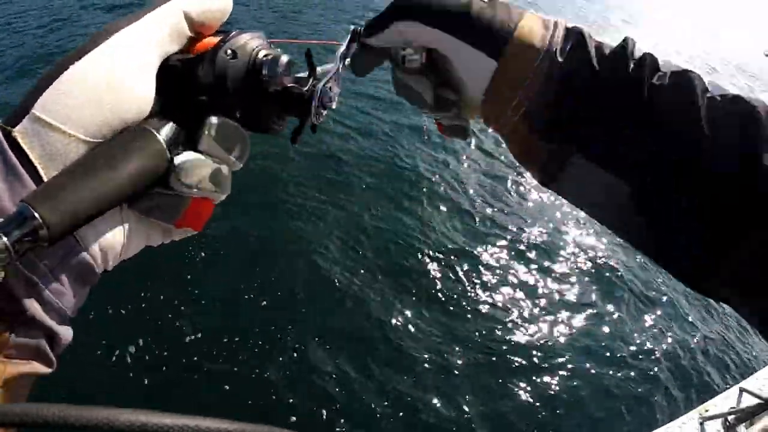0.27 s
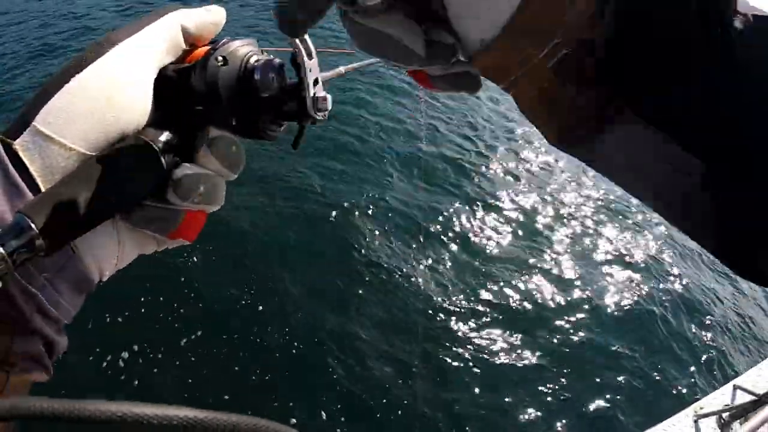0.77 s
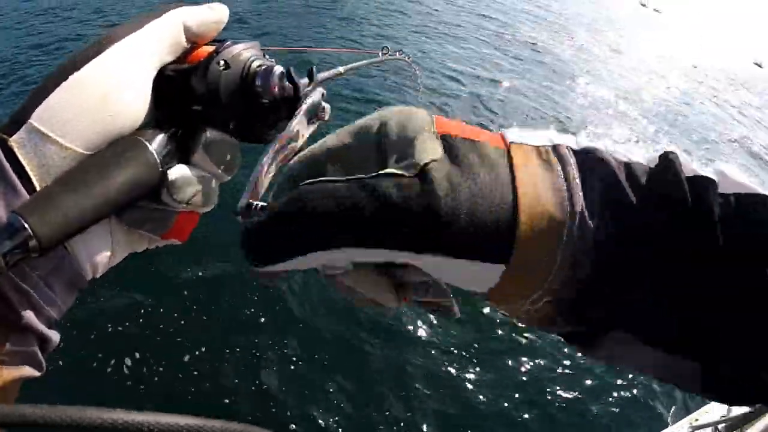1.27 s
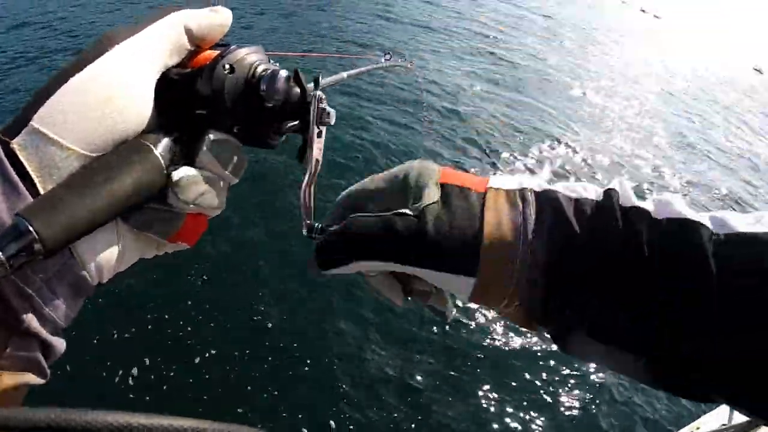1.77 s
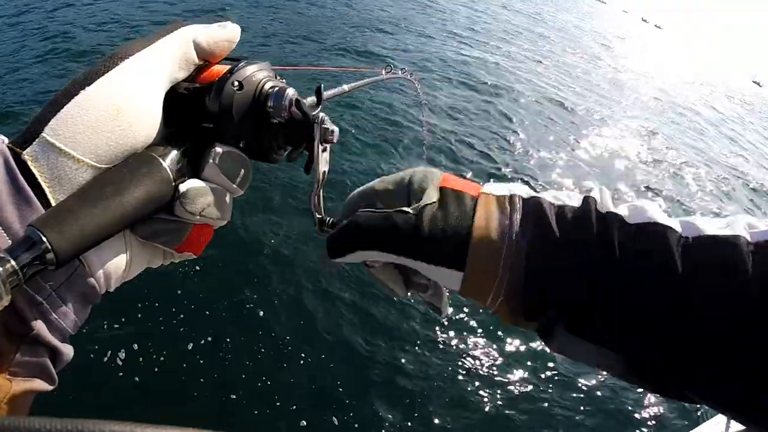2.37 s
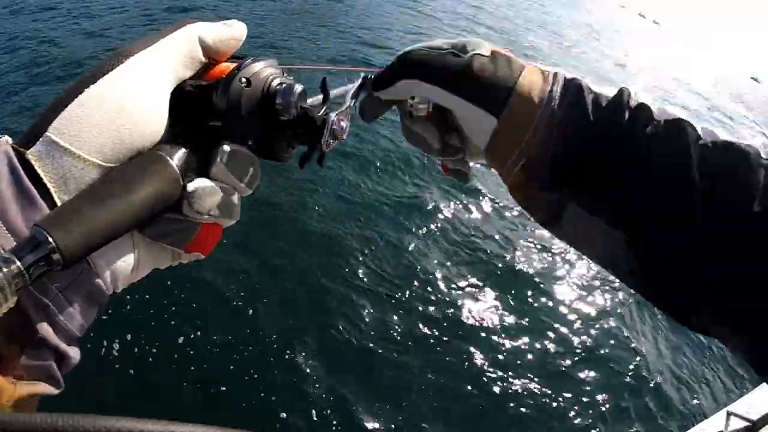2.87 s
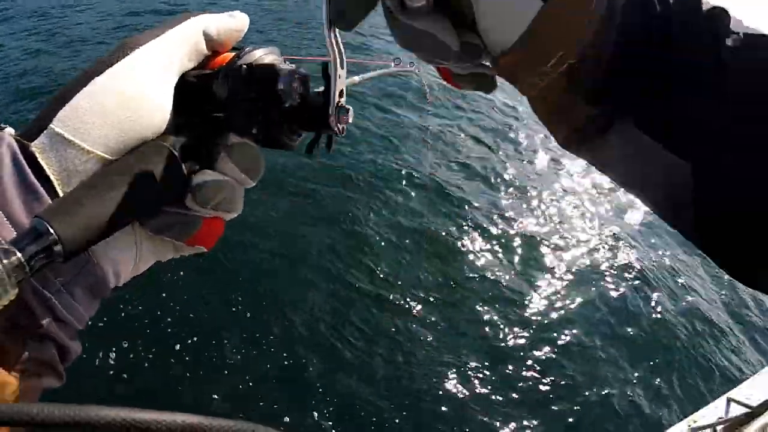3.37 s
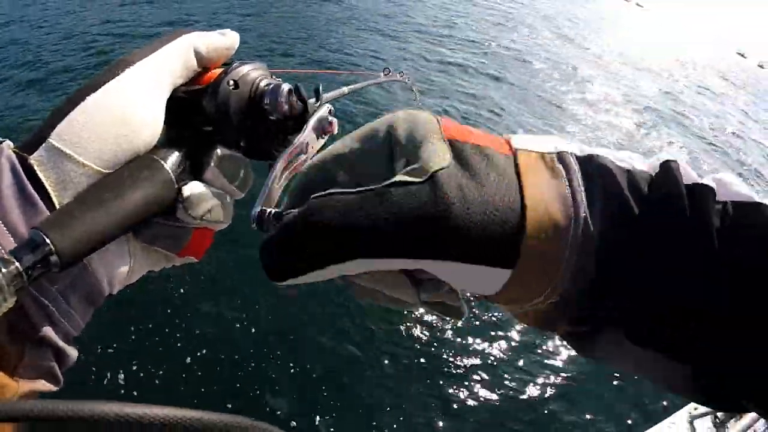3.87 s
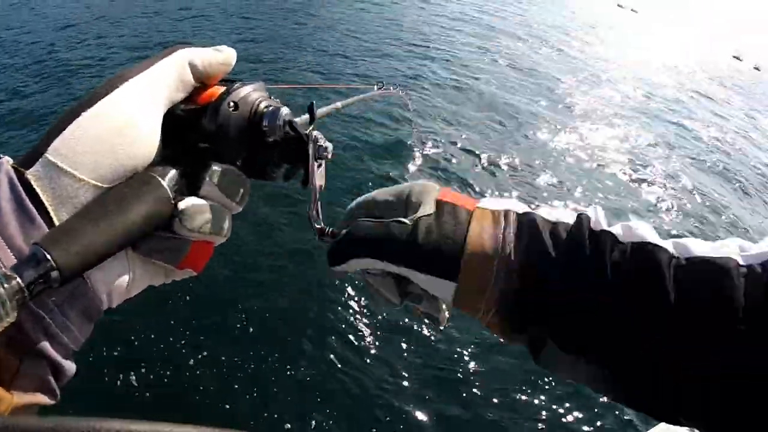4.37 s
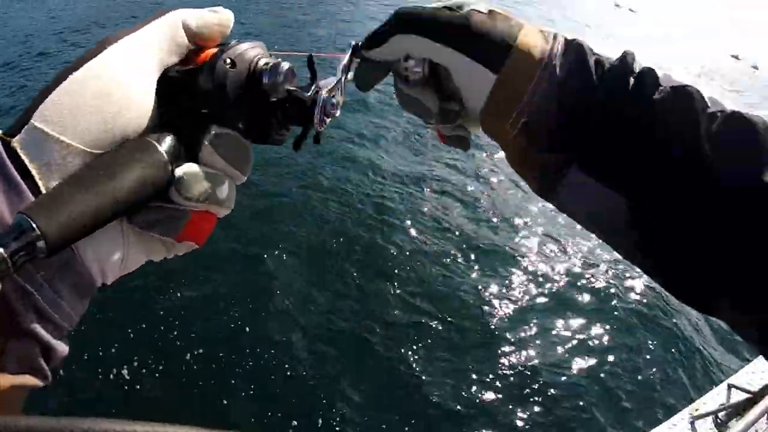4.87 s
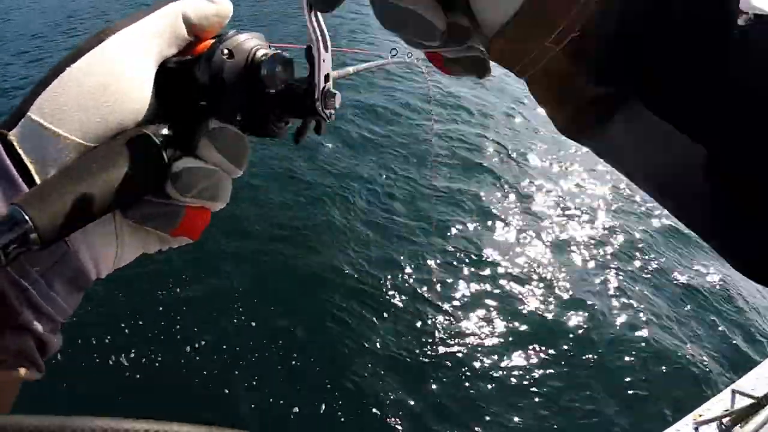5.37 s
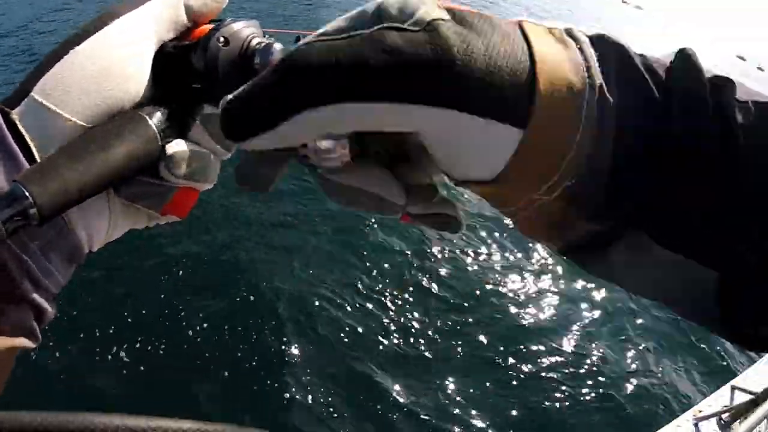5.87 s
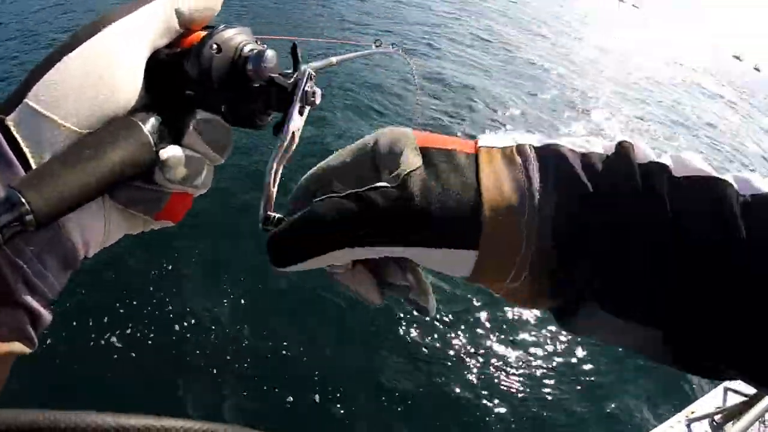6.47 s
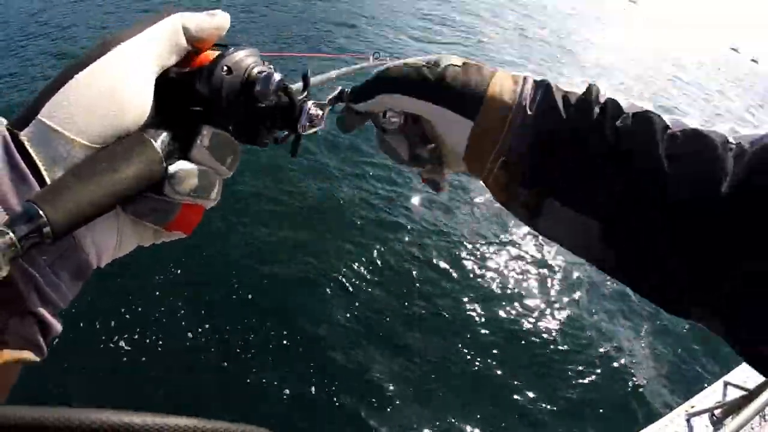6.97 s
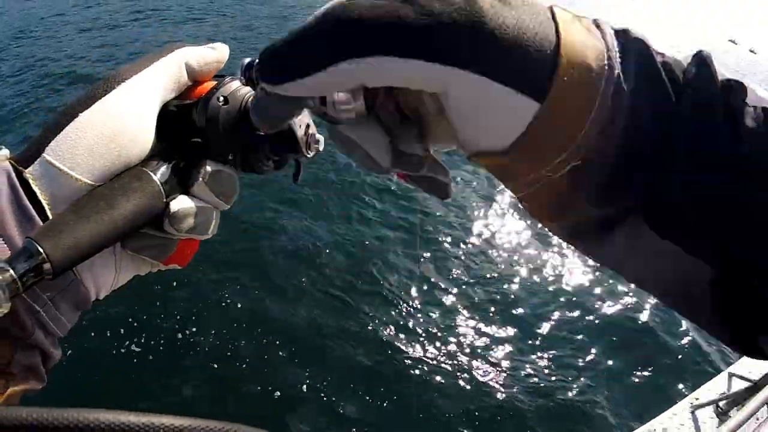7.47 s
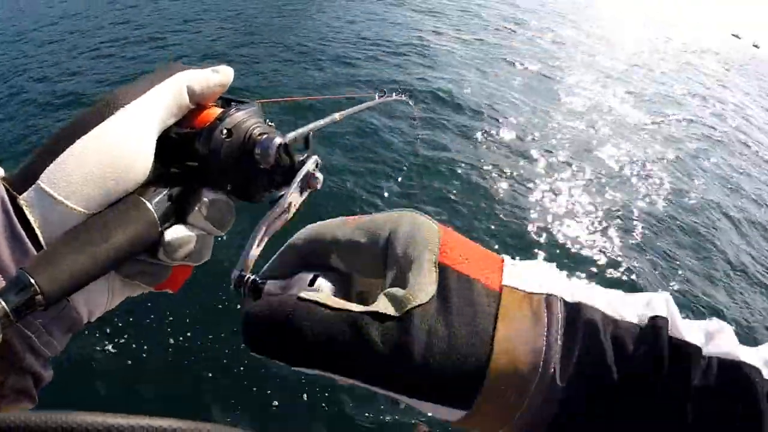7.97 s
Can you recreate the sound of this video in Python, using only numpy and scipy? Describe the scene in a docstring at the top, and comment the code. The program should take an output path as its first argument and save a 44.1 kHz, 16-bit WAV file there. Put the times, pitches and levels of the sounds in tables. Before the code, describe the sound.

On a small fishing boat, a diesel engine idles with a steady low rumble and light rattle while wind thumps irregularly on the microphone. Close by, a fishing reel starts winding almost at once and keeps going, its gears whirring and grinding with brief squeaks and sharp ticks. A sleeve brushes past now and then, and the sea washes faintly behind.

```python
"""Wind thumps on the microphone over the rumble of an idling six-cylinder diesel.
We stand at the rail of a small fishing boat: the sea washes behind, machinery hums on board, and
each firing sets the engine block clattering and a loose fitting rattling. Close by, an angler winds
in a reel whose gears whirr, grind, squeak and tick; a sleeve brushes past and faint hoots come and go.
One microphone hears it all, with a limiter holding the gusts down."""
import sys
import numpy as np
from scipy import signal
from scipy.fft import rfft, irfft, next_fast_len
from scipy.io import wavfile
from scipy.ndimage import uniform_filter1d, minimum_filter1d, map_coordinates

SR = 44100
rng = np.random.default_rng(int(sys.argv[2]) if len(sys.argv) > 2 else 0)


def int16_out(signal):
    """Quantize to a 16-bit WAV file."""
    q = np.round(np.clip(np.atleast_2d(signal).T, -1, 1) * 32767)
    wavfile.write(sys.argv[1], SR, q.astype(np.int16))


N = 361971


def from_db(db):
    """Decibels to gain."""
    return 10 ** (np.asarray(db) / 20)


def rms_one(x):
    """Scale to unit power."""
    return x / np.sqrt(np.mean(x ** 2) + 1e-20)


def seconds():
    """The time of every sample."""
    return np.arange(N) / SR


def in_time(curve):
    """Join (time, value) points by straight lines."""
    return np.interp(seconds(), *np.transpose(curve))


def swell(centre_s, half_s):
    """A bell-shaped envelope, down to 1/e at half_s either side of its centre."""
    return np.exp(-np.minimum(((seconds() - centre_s) / half_s) ** 2, 50))


def drift(rate):
    """A smooth random wander with spread 1, changing about rate times a second."""
    step, settle = 40, 2000
    pole = np.exp(-2 * np.pi * step * rate / SR)
    white = rng.standard_normal(N // step + settle + 2)
    slow = signal.lfilter([1], [1, -2 * pole, pole * pole], white)[settle:]
    return np.interp(np.arange(N) / step, np.arange(len(slow)), rms_one(slow))


def filtered(x, order, hz, kind):
    """A maximally flat low-, high- or band-pass."""
    return signal.sosfilt(signal.butter(order, hz, kind, fs=SR, output="sos"), x)


def coloured(x, spectrum):
    """Give a signal a spectrum that falls away steeply beyond its ends; rms 1."""
    hz, db = np.transpose(spectrum)
    size = next_fast_len(N)
    f = np.maximum(np.arange(size // 2 + 1) * SR / size, 1)
    skirts = np.minimum(f / hz[0], 1) ** 2 * np.minimum(hz[-1] / f, 1) ** 2
    shape = from_db(np.interp(np.log(f), np.log(hz), db))
    return rms_one(irfft(rfft(x, size) * skirts * shape, size)[:N])


def noise(spectrum):
    """Noise with the given spectrum; rms 1."""
    return coloured(rng.standard_normal(N), spectrum)


def evened(x, span_s):
    """Take the slow swells out of a noise."""
    return x / np.sqrt(uniform_filter1d(x ** 2, max(int(span_s * SR), 2)) + 1e-9)


def resonate(x, modes):
    """Parallel resonances of alternating sign."""
    out = np.zeros(len(x))
    for k, (hz, width, db) in enumerate(modes):
        r = np.exp(-np.pi * width / SR)
        poles = [1, -2 * r * np.cos(2 * np.pi * hz / SR), r * r]
        out += (-1) ** k * from_db(db) * (1 - r * r) / 2 * signal.lfilter([1, 0, -1], poles, x + 1e-18)
    return out


def steep_ring(x, hz, width, skirt_hz, db=0):
    """One resonance, its skirts trimmed by a second of width skirt_hz."""
    return resonate(resonate(x, [(hz, width, db)]), [(hz, skirt_hz, 0)])


# Water around the boat: f/Hz, relative density/dB
SEA_SPECTRUM = [(300, 3), (800, -2.5), (1100, -9.5), (1600, -15), (2300, -12.5), (3000, -18.5), (4000, -18),
                (5000, -35.5), (5850, -33), (6400, -27.5), (7500, -28), (10000, -32), (12000, -36.5),
                (15000, -37.5)]

def sea(level_db=-46.0, lapping_db=0.8):
    """The even wash of the water, out beyond the rail."""
    return from_db(level_db + lapping_db * drift(4.3)) * noise(SEA_SPECTRUM)


# Steady machinery on board: f/Hz, relative level/dB
HUM_TONES = [(36.1, -30), (60.7, -27), (78.2, -31), (84.3, -31.5), (117.1, -31.5), (144.4, -33.5),
             (272.9, -48), (367.9, -46.5), (412.5, -45.5)]

def machinery(hum_db=2.0, waver_db=3.5):
    """Steady tones from elsewhere on the boat beat against the engine."""
    clock = seconds() + np.cumsum(0.00089 * drift(0.72)) / SR
    tones = sum(from_db(db + waver_db * drift(1.98)) * np.sin(2 * np.pi * (hz * clock + rng.random()))
                for hz, db in HUM_TONES)
    return from_db(hum_db) * tones


# Hollow tones in the background: t/s, length/s, start f/Hz, end f/Hz, relative level/dB
HOOT_GLIDES = [(0.33, 0.081, 490, 433, -30.5), (1.054, 0.1, 501, 517, -32.5),
               (3.637, 0.34, 485, 427, -32.5)]

def hoots(waver=0.00515):
    """Faint hollow tones start quickly and glide as they fade."""
    out = np.zeros(N)
    for s, length, start_hz, end_hz, db in HOOT_GLIDES:
        along = np.clip((seconds() - s) / length, 0, 1)
        hz = (start_hz + (end_hz - start_hz) * along) * (1 + waver * drift(20.4))
        envelope = np.minimum(along * 12, 1) * np.sqrt(1 - along)
        out += from_db(db) * envelope * np.sin(2 * np.pi * np.cumsum(hz) / SR)
    return out


# Resonances of a loose fitting on board: f/Hz, width/Hz, relative level/dB
FITTING_MODES = [(3240, 90, -2), (3390, 39, 1.5), (3484, 74, 0)]
# How hard it rattles: t/s, relative level/dB
RATTLE_LEVEL = [(0.15, -65.5), (0.75, -55), (0.9, -65), (1.12, -52), (1.7, -60), (2.42, -55), (2.65, -69),
                (2.9, -53), (3.1, -62), (3.5, -53), (3.87, -50.5), (4.1, -57), (4.35, -51.5), (4.6, -55.5),
                (4.92, -49), (5.35, -62), (5.87, -49.5), (6.2, -63), (6.47, -52.5), (6.85, -61), (7.1, -56),
                (7.3, -59), (8.2, -51.5)]

def rattle(firings, level_db=-1.5, jitter_s=0.0006, uneven_db=2.0, mode_spread_db=4.0, bounce_db=-12.5):
    """Each firing knocks the fitting, a little early or late; it bounces once, and no two ring alike."""
    beats = np.flatnonzero(np.diff(np.floor(firings + 0.5)))
    hits = beats + jitter_s * SR * rng.standard_normal(len(beats))
    bounces = hits + SR * rng.uniform(0.0035, 0.0203, len(beats))
    when = np.clip(np.r_[hits, bounces].astype(int), 0, N - 1)
    knock_db = np.repeat([0, bounce_db], len(beats)) + uneven_db * rng.standard_normal(len(when))
    ringing = np.zeros(N)
    for hz, width, db in FITTING_MODES:
        strength = from_db(knock_db + mode_spread_db * rng.standard_normal(len(when)))
        knocks = np.zeros(N)
        knocks[when] = strength * rng.choice([-1, 1], len(when))
        ringing += steep_ring(knocks, hz, width, skirt_hz=600, db=db)
    return from_db(in_time(RATTLE_LEVEL) + level_db) * evened(rms_one(ringing), span_s=0.72)


FIRING_HZ, CYLINDERS = 47.45, 6
# Engine rumble at the rail: multiple of the working cycle, relative level/dB
ENGINE_ORDERS = [(6, -35.5), (9, -34.5), (12, -26.5), (14, -41.5), (16, -30), (18, -50.5), (21, -30),
                 (22, -51), (30, -51), (32, -49.5), (45, -51.5), (51, -50.5)]
# Resonances of the engine block: f/Hz, width/Hz, relative level/dB
BLOCK_MODES = [(897, 24, 5.5), (1430, 82, -2.5), (1594, 160, -6), (1850, 130, -6.5), (2120, 61, -7),
               (2835, 44, -7), (4700, 480, -26)]

def diesel(rumble_db=-5.5, clatter_db=-50.5, knock_sharpness=2.4, uneven_db=1.0, waver_db=3.0):
    """The engine rumbles at orders of its working cycle; each firing shakes the block and the fitting."""
    firings = np.cumsum(FIRING_HZ * (1 + 0.0012 * drift(1.683))) / SR
    cycle = firings / CYLINDERS
    rumble = sum(from_db(db + waver_db * drift(2.3)) * np.sin(2 * np.pi * (order * cycle + rng.random()))
                 for order, db in ENGINE_ORDERS)
    knock = np.sin(np.pi * firings) ** 2
    cylinder_db = uneven_db * rng.standard_normal(CYLINDERS)
    bursts = knock ** knock_sharpness * from_db(cylinder_db[firings.astype(int) % CYLINDERS])
    clatter = rms_one(resonate((0.34 + bursts) * rng.standard_normal(N), BLOCK_MODES))
    return from_db(rumble_db) * rumble + from_db(clatter_db) * clatter + rattle(firings)


# Large eddies on the microphone: f/Hz, relative density/dB
BUFFET_SPECTRUM = [(10, -16.5), (18, -2), (32, 3), (55, 0.5), (80, -5), (115, -6), (160, -20), (250, -27),
                   (400, -62.5)]
# Small eddies on the microphone: f/Hz, relative density/dB
EDDY_SPECTRUM = [(90, -26.5), (160, -0.5), (250, -0.5), (330, -6), (430, -9), (550, -15.5), (750, -23),
                 (1100, -36.5), (2000, -40.5)]
# Level of the deep rumble on the microphone, with its swells and brief dips: t/s, relative level/dB
DEEP_RUMBLE_LEVEL = [(0.0, -16.5), (0.21, -10.5), (0.26, -17), (0.36, -13.5), (0.55, -11.5), (0.79, -15.5),
                     (0.92, -15.5), (1.16, -11), (1.26, -17.5), (1.55, -15), (1.95, -14), (2.08, -15),
                     (2.2, -14), (2.42, -14), (2.53, -15), (2.71, -20.5), (2.83, -10.5), (2.9, -20.5),
                     (3.04, -7), (3.1, -15.5), (3.17, -12.5), (3.37, -12.5), (3.56, -18.5), (3.7, -14.5),
                     (3.86, -15.5), (3.96, -14), (4.23, -15), (4.42, -11), (4.56, -16), (4.66, -15.5),
                     (4.84, -11), (4.91, -17.5), (4.98, -14), (5.25, -18), (5.7, -14.5), (5.86, -17),
                     (5.97, -17), (6.44, -12.5), (6.7, -15), (6.87, -16), (6.98, -22), (7.14, -11),
                     (7.21, -15), (7.28, -17), (7.52, -14.5), (7.8, -13.5), (7.92, -20), (8.02, -13.5),
                     (8.18, -10.5)]

def wind(buffet_db=-1.0, gusty_db=1.0, eddy_db=-29.0, eddy_follows=0.16, lumpy_db=1.5, mean_db=-14.5):
    """Large eddies rumble on the microphone's port; smaller ones come in lumps that follow a little."""
    rumble_db = in_time(DEEP_RUMBLE_LEVEL)
    push = from_db(rumble_db + buffet_db + gusty_db * drift(5.4))
    buffet = push * evened(noise(BUFFET_SPECTRUM), span_s=0.065)
    lumps = evened(noise(EDDY_SPECTRUM) * from_db(lumpy_db * drift(48)), span_s=0.15)
    return buffet + from_db(eddy_db + eddy_follows * (rumble_db - mean_db)) * lumps


# Gusts right on the microphone: t/s, half length/s, boom f/Hz, boom level/dB, relative flutter level/dB
GUSTS = [(0.065, 0.023, 121.3, -20, -22.5), (0.217, 0.028, 107, -24, -24), (0.34, 0.021, 87, -10, -26),
         (1.191, 0.038, 97, -20, -22), (1.759, 0.015, 112, -15, -20.5), (1.852, 0.02, 89, -9.5, -26.5),
         (2.157, 0.043, 87, -11.5, -26), (2.625, 0.013, 135, -15.5, -24), (2.955, 0.02, 98.7, -17, -24),
         (3.007, 0.033, 97, -20.5, -26), (3.142, 0.0088, 145, -18, -34), (3.683, 0.049, 118, -13, -22.5),
         (4.176, 0.022, 126, -17, -20), (4.332, .02, 110, -19, -33), (4.49, 0.036, 130, -13.5, -38),
         (4.937, 0.011, 150, -10.5, -37), (5.104, 0.029, 102, -7, -43), (6.117, 0.031, 135, -17.5, -26),
         (6.379, 0.016, 140, -15, -27), (6.446, 0.018, 108, -7.5, -24), (6.497, 0.016, 98, -12.5, -28),
         (6.768, 0.031, 85, -12.5, -23.5), (6.879, 0.02, 84.8, -9, -15), (7.126, 0.047, 88, -16, -22.5),
         (7.276, 0.021, 128, -11, -30.5), (7.464, 0.026, 120, -13, -24.5), (7.643, 0.029, 122, -9.5, -26.5),
         (7.838, 0.025, 106.6, -13, -26), (8.152, 0.031, 95.4, -8, -16)]
# The flutter of a gust: f/Hz, relative density/dB
FLUTTER_SPECTRUM = [(130, -3.5), (180, 7.5), (290, -1), (400, -11.5), (700, -26.5), (1500, -41)]

def gusts(flutter_db=0.5, wobble=0.12):
    """A gust slaps the microphone: a few cycles of deep, unsteady boom with a rough flutter on top."""
    out = np.zeros(N)
    flutter = evened(noise(FLUTTER_SPECTRUM), span_s=0.014)
    clock = seconds() + np.cumsum(wobble * drift(28.0)) / SR
    for s, half, hz, boom_db, rough_db in GUSTS:
        boom = np.sin(2 * np.pi * (hz * clock + rng.random()))
        out += swell(s, half) * (from_db(boom_db) * boom + from_db(rough_db + flutter_db) * flutter)
    return out


# Cloth on cloth: f/Hz, relative density/dB
CLOTH_SPECTRUM = [(2000, 0.5), (3000, 12.5), (4000, -3.5), (5500, -14.5), (8000, -14.5), (11000, -31)]
# Sleeve strokes near the microphone: t/s, half length/s, rub level/dB, zip level/dB, top zip f/Hz
SLEEVE_STROKES = [(0.05, 0.033, -59, -68, 6500), (1.02, 0.14, -53, -66, 6800),
                  (3.196, 0.21, -57.5, -69, 6600), (7.07, 0.12, -51.5, -68, 7000),
                  (7.176, 0.09, -53, -63.5, 6860), (7.505, 0.027, -54, -58, 5000),
                  (8.15, 0.054, -48, -55, 5100)]

def sleeve(rough_db=2.0, weave_hz=330, zip_sag=0.069):
    """Cloth rubs on cloth; its weave zips at a pitch that follows the speed of the stroke."""
    out, rub = np.zeros(N), noise(CLOTH_SPECTRUM)
    weave = rms_one(filtered(rng.standard_normal(N), 2, weave_hz, "low"))
    for s, half, rub_db, zip_db, top_hz in SLEEVE_STROKES:
        speed = swell(s, half)
        hz = top_hz * (1 - zip_sag * (1 - speed))
        zipping = weave * np.sin(2 * np.pi * np.cumsum(hz) / SR)
        out += speed * (from_db(rub_db) * rub + from_db(zip_db) * zipping)
    return from_db(rough_db * drift(60)) * out


# The reel rubs and sings: t/s, half length/s, f/Hz, nominal width/Hz, level/dB
REEL_SQUEAKS = [(.755, .032, 2160, 60, -45), (1.007, .027, 2220, 50, -44.5), (1.374, 0.028, 2150, 55, -45),
                (1.596, .02, 2130, 80, -45), (2.166, 0.06, 2160, 80, -44.5), (2.66, 0.024, 2260, 110, -43),
                (2.796, .035, 2240, 130, -44), (3.04, 0.054, 2380, 250, -51), (4.026, 0.018, 2210, 80, -44),
                (4.167, 0.022, 2150, 60, -45), (5.075, 0.083, 2350, 220, -45), (5.56, .06, 2130, 80, -51),
                (5.72, 0.039, 2140, 110, -44), (5.993, 0.043, 2130, 55, -44),
                (6.484, 0.057, 2150, 220, -46.5), (7.277, 0.059, 1750, 250, -46),
                (7.475, 0.05, 1850, 300, -44.5), (7.674, 0.027, 1920, 120, -42.5),
                (7.768, .044, 1860, 110, -43), (8.156, 0.054, 2100, 220, -41)]

def squeaks():
    """Friction in the reel drives one narrow resonance for a moment."""
    out, friction = np.zeros(N), rng.standard_normal(N)
    for s, half, hz, width, db in REEL_SQUEAKS:
        ring = steep_ring(friction, hz, 1.8 * width, skirt_hz=1.8 * width)
        out += from_db(db) * swell(s, half) * evened(rms_one(ring), span_s=0.018)
    return out


# Ticks of the reel, close by: t/s, relative level/dB, favoured f/Hz
REEL_TICKS = [(0.0555, -39, 2600), (1.2166, -39, 4200), (1.4621, -46, 5500), (2.0300, -44, 5200),
              (2.1585, -48, 6500), (2.7092, -46, 5800), (3.2824, -45, 4300), (3.9577, -32, 3600),
              (4.0036, -37, 4600), (4.5094, -46, 5200), (4.6352, -35, 3000), (4.7530, -45, 4300),
              (5.2924, -38, 5000), (5.989, -43, 5000), (6.081, -37, 4250), (6.1374, -45, 3800),
              (7.1262, -43, 4600), (7.4894, -48, 5400), (8.1686, -31, 3000)]
# Resonances of its housing: f/Hz, width/Hz, relative level/dB
HOUSING_MODES = [(1630, 200, 3.5), (2130, 270, 11), (2760, 180, 5), (3310, 180, 2.5), (4250, 340, 1),
                 (5160, 710, -5), (6440, 800, -10)]

def ticks(tick_db=8.0, chatter_db=-23.5, chatter_s=0.0017, focus_db_per_octave=10.0, snap_db=-10.0):
    """Each click snaps, rings the housing near its own pitch and chatters as the parts settle."""
    out = np.zeros(N + SR)
    after = np.arange(SR // 25) / SR
    impulse = 1.0 * (after == 0)
    snap = filtered(impulse, 3, [4600, 6400], "band")
    snap *= from_db(snap_db) / np.abs(snap).max()
    for s, db, pitch_hz in REEL_TICKS:
        chatter = from_db(chatter_db) * np.exp(-after / chatter_s) * rng.standard_normal(len(after))
        modes = [(hz, width, mode_db - focus_db_per_octave * abs(np.log2(hz / pitch_hz)))
                 for hz, width, mode_db in HOUSING_MODES]
        ring = resonate(impulse + chatter, modes)
        start = int(s * SR)
        out[start:start + len(after)] += from_db(db + tick_db) * (ring / np.abs(ring).max() + snap)
    return out[:N]


# Resonances of the reel's frame: f/Hz, width/Hz, relative level/dB
FRAME_MODES = [(1396, 48, -3), (1508, 54, -7), (1600, 32, -1), (1752, 33, -3), (1878, 45, -1.5),
               (2004, 28, -7), (2150, 60, 0), (2300, 140, -2)]

def grind(patchy_db=5.5, wander=0.01202):
    """Teeth rub on one resonance of the frame after another; the pitches wander as under uneven load."""
    rings = np.zeros(N)
    for hz, width, db in FRAME_MODES:
        ring = steep_ring(rng.standard_normal(N), hz, width, skirt_hz=4 * width)
        rings += rms_one(ring) * from_db(db + patchy_db * drift(11))
    clock = np.cumsum(1 + wander * drift(6))
    return evened(map_coordinates(rings, [clock], order=3, mode="mirror"), span_s=0.043)


# Contacts of teeth and line, close by: f/Hz, relative density/dB
GEAR_SPECTRUM = [(700, -25), (1150, -2.5), (1450, -1.5), (2030, -2), (2170, 3), (2320, -2.5), (2650, -6),
                 (3400, -6), (3900, -10), (4450, -11.5), (5100, -12), (5450, -18.5), (5800, -33.5),
                 (6800, -24.5), (9000, -33)]
# How hard the angler winds: t/s, relative level/dB
WINDING_EFFORT = [(0.0, -65), (0.12, -56.5), (0.35, -49.5), (0.8, -45), (1.28, -46), (1.62, -44.5),
                  (2.6, -45.5), (3.1, -44.5), (3.65, -46.5), (3.95, -44.5), (5.08, -44), (5.22, -45),
                  (5.95, -46), (6.5, -46.5), (6.93, -48.5), (7.2, -45), (7.78, -44), (7.97, -46.5),
                  (8.18, -43)]
# The handle passes the bottom of each turn: t/s
HANDLE_TURNS = [-0.15, 0.53, 1.2, 1.8, 2.45, 3.08, 3.8, 4.45, 5.1, 5.78, 6.42, 7.2, 7.92, 8.6]

def gears(whirr_db=-5.5, grind_db=-4.5, rasp_db=-9.5, grain_db=1.5, catch_db=1.5, split_hz=2550,
          push_db=0.1, push_lead_turns=0.3, rasp_flicker_db=1.0):
    """Dense tiny contacts of teeth and line catch unevenly and swell very slightly with every turn."""
    turn = np.interp(seconds(), HANDLE_TURNS, np.arange(len(HANDLE_TURNS)))
    effort_db = in_time(WINDING_EFFORT) + push_db * np.cos(2 * np.pi * (turn + push_lead_turns))
    grains = rng.standard_normal(N) * from_db(grain_db * drift(180) + catch_db * drift(9.9))
    contacts = coloured(grains, GEAR_SPECTRUM)
    whirr = from_db(whirr_db) * rms_one(filtered(contacts, 4, split_hz, "low"))
    grinding = from_db(grind_db) * grind()
    treble = rms_one(filtered(contacts, 4, split_hz, "high"))
    rasp = from_db(rasp_db + rasp_flicker_db * drift(22.0)) * treble
    return from_db(effort_db) * (whirr + grinding + rasp)


def scene():
    """Boat, weather and angler at one microphone by the rail."""
    reel = gears() + squeaks() + ticks()
    boat = diesel() + machinery()
    weather = wind() + gusts() + sea()
    return (boat + weather + reel + sleeve() + hoots())[None]


def record(dry, ceiling=0.65, hold_s=0.0033, cutoff_hz=15500):
    """After the microphone, a soft-kneed look-ahead limiter ducks the highest peaks; the top is cut."""
    span = int(hold_s * SR)
    allowed = (1 + (dry / ceiling) ** 10) ** (-1 / 10)
    gain = uniform_filter1d(minimum_filter1d(allowed, span), span)
    top_cut = signal.ellip(10, 0.1, 80, cutoff_hz, fs=SR, output="sos")
    return signal.sosfilt(top_cut, dry * gain)


dry = scene()
out = record(dry)
int16_out(out)
```